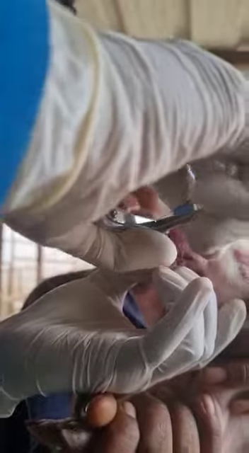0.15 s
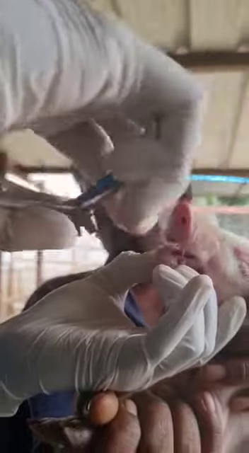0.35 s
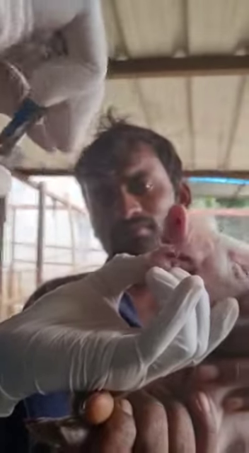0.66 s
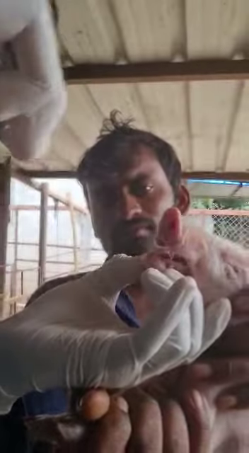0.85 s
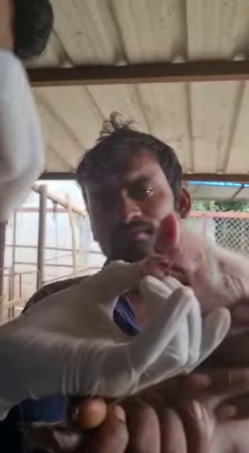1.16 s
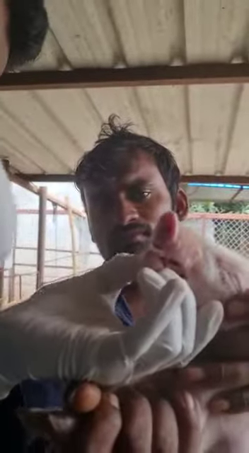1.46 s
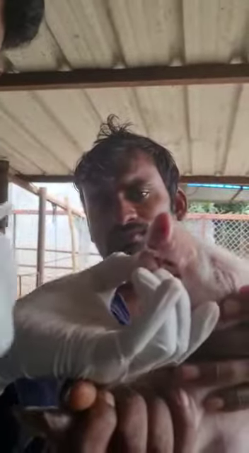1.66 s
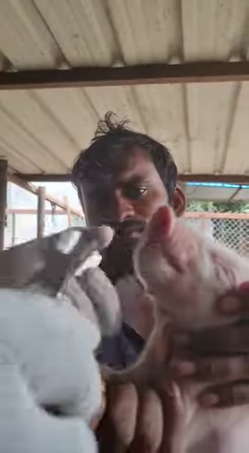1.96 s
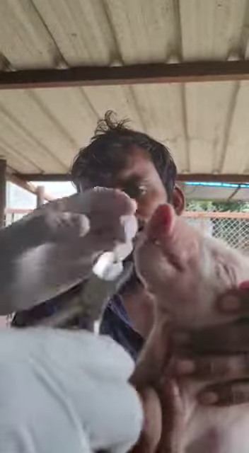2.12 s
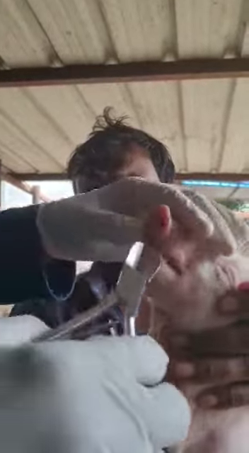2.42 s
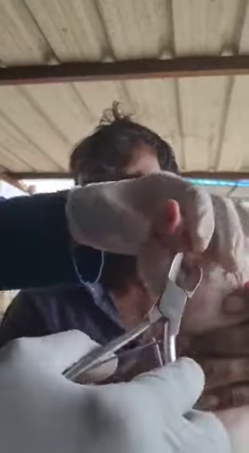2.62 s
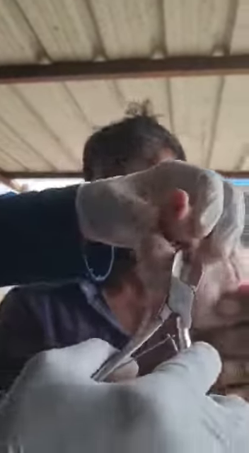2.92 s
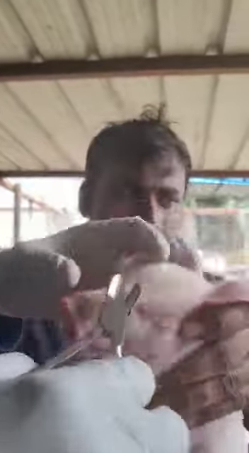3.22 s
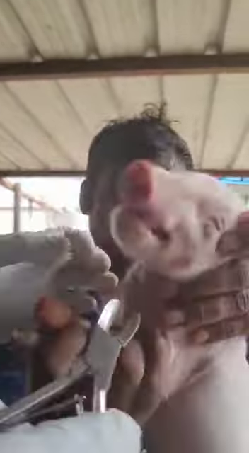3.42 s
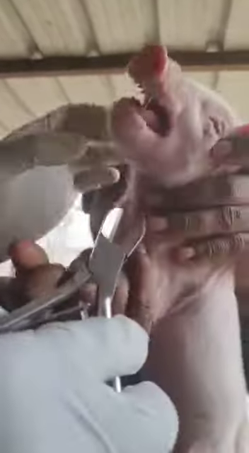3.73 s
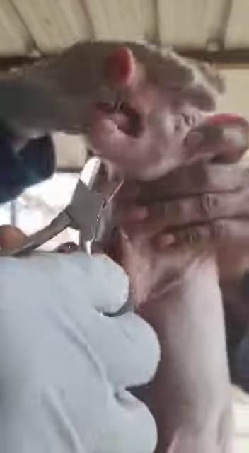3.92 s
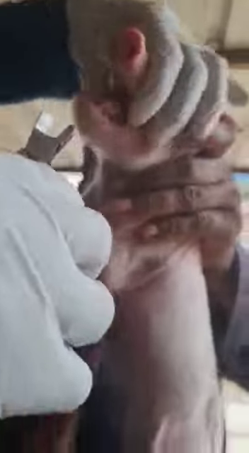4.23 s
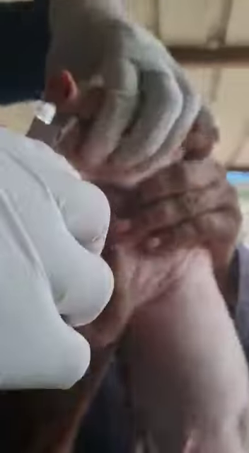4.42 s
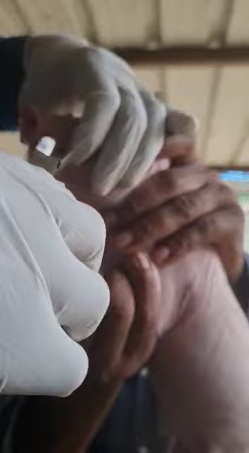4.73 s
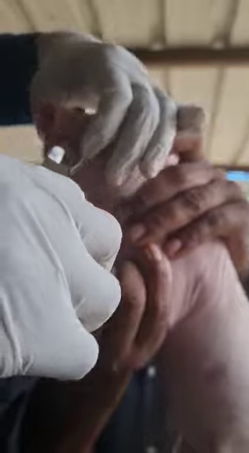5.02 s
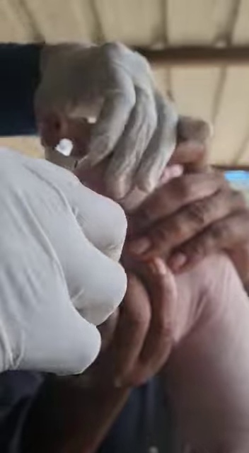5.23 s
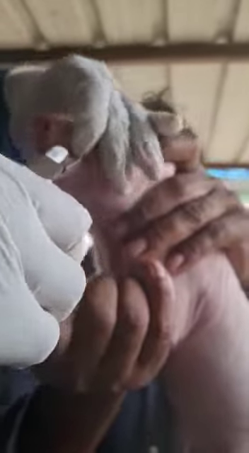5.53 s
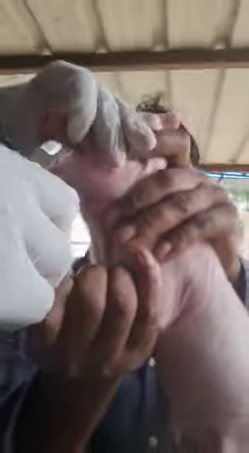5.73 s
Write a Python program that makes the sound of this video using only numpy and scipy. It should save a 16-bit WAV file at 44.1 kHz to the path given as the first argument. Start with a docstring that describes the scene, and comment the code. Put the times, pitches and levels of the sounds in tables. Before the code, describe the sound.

A close, slightly stereo phone pickup of a newborn piglet held in a roofed shed. At 0 to 0.55 s come short whines and a throaty growl with a soft bump. From about 0.6 to 1.0 s a piercing squeal wavers around 3.3 kHz and falls steeply at the end. Low nasal grunts, rattling roughly a hundred pulses a second, follow at 1.2-1.6, 1.9-2.35 and 2.55-2.75 s, with a brief whine at 1.6 s and a weak whimper near 2.7 s. Barks and yelps from 2.95 s climb into a shriek, then a harsh, trembling scream near 3.6 kHz from 3.4 to 4.3 s, the loudest event. A faint mutter and a tiny squeak near 4.6 s fade into near quiet around 5 s. A high wail swells from about 5.4 s, ending in a rough cry. Handling rumble, dull shed wash and short echoes sit beneath.

```python
"""Piglet held under a shed roof

A newborn piglet, held close to a phone's two microphone ports, squeals and grunts in turn.
Each squeal is a high whistle shaken by a second, lower oscillator in the larynx; most open in rasp,
reach a held note and slide away at the end. In the grunts the throat rattles in slow pulses through the snout.
Around it: faint wheezes, soft bumps, handling rumble, the wash of the shed, echoes off hands, chest and roof."""
import sys
import numpy as np
from scipy import signal
from scipy.fft import rfft, irfft, next_fast_len
from scipy.io import wavfile
from scipy.ndimage import map_coordinates

SR = 44100
rng = np.random.default_rng(int(sys.argv[2]) if len(sys.argv) > 2 else 0)


def output_pcm(signal):
    """Save a mono or channel-first signal as 16-bit PCM at the path in sys.argv[1].

    Samples are clipped to [-1, 1] before scaling.
    """
    pcm = np.clip(np.atleast_2d(signal).T, -1, 1) * 32767
    wavfile.write(sys.argv[1], SR, np.round(pcm).astype(np.int16))


N = 258867
T = np.arange(N) / SR  # s

# Mouth shapes of the cries; only the shape within a register counts. Each row: frequency in Hz, gain in dB.
WHINE_MOUTH = [(200, -49), (800, 2.5), (1150, -6.5), (1700, 4.5), (2800, -0.5), (4200, -12.5), (5200, -7),
               (7000, -20.5), (8800, -7.5), (11500, -18.5), (16000, -16.5)]
SQUEAL_MOUTH = [(200, -17), (400, -10), (800, -13), (1150, -29.5), (1800, 9.5), (2600, 1), (3400, -4),
                (4600, -12), (5700, -13), (6700, -15), (8100, -31), (9400, -11.5), (10800, -10.5),
                (11800, -23.5), (13600, -7.5), (16000, -31)]
DOUBLE_MOUTH = [(200, -1), (800, -6.5), (1150, -7), (2200, 9), (3200, -19.5), (3900, -11.5), (5100, -11.5),
                (6300, -10.5), (7500, -4.5), (8500, -1), (9800, -11), (12000, -7.5), (16000, -24)]
SCREAM_MOUTH = [(200, -36), (1000, -26.5), (1300, -10.5), (2200, 2.5), (2900, -12.5), (3600, -6.5),
                (4700, -13), (5600, -2), (6600, -8.5), (7400, -10), (8700, -3), (9900, -14), (11800, -1.5),
                (14500, -12.5), (16000, -22.5)]
WAIL_MOUTH = [(200, -20), (800, -20.5), (1150, -13.5), (1900, 0), (2700, -16), (3500, -13.5), (4300, -15),
              (5500, -9.5), (7300, -1.5), (9000, 1.5), (11800, 8), (13500, -13.5), (16000, -14)]
BARK_MOUTH = [(200, -13.5), (350, -6.5), (1100, -8.5), (2100, 3), (2600, 4.5), (3100, -28.5), (3600, -0.5),
              (4400, -21.5), (5900, 5.5), (6900, -16.5), (8900, -4.5), (11000, -10), (16000, -12)]
SHRIEK_MOUTH = [(200, -9), (400, 6), (1100, -8.5), (2100, 8.5), (3000, -14), (3700, -10), (5000, -25.5),
                (6200, 9), (7200, -4.5), (8700, 2), (11000, -10), (15500, -5)]
CROAK_MOUTH = [(200, 2), (350, 5), (1100, -2.5), (2000, 18.5), (3700, -9), (5500, 2), (7200, -16.5),
               (11500, -18), (14000, -27)]
YELP_MOUTH = [(200, -6), (800, -6.5), (1150, -8), (2200, 10), (3200, -24), (3900, -2.5), (5100, -13),
              (6400, 3), (7300, -10), (9200, 2.5), (10500, -12), (12000, -4), (16000, -11)]

# Tract shapes of the grunts, from open to nearly shut. Each row: frequency in Hz, gain in dB.
GROWL_TRACT = [(100, -27), (200, -3.5), (290, 3.5), (450, -16), (800, -7.5), (1200, -14.5), (1800, 9.5),
               (2900, -8), (3500, -7), (4400, -22), (5250, -6), (6500, -28), (9000, -25), (13000, -28.5),
               (16000, -29.5)]
GRUNT_TRACT = [(100, -16), (200, -1.5), (300, 4), (410, -4), (520, -13.5), (680, -6), (850, -5.5),
               (1100, -17.5), (1600, -4.5), (2500, -16), (3100, -24.5), (4400, -26.5), (5200, -34),
               (6300, -32), (9000, -44.5), (15500, -31)]
SNORT_TRACT = [(100, -23), (190, -9.5), (280, 1.5), (450, -14.5), (700, -7.5), (1100, -18.5), (1500, -17),
               (2500, -17.5), (3100, -27.5), (4400, -40), (6000, -39.5), (8500, -40), (11000, -38),
               (15500, -37.5)]
MUTTER_TRACT = [(100, -15.5), (190, -4.5), (280, 4.5), (430, -10.5), (650, -3.5), (1050, -18.5),
                (1350, -12.5), (1800, -29), (2300, -25), (3000, -39.5), (6000, -56), (8500, -49.5),
                (12000, -73), (15000, -50)]

# Edges in Hz between the low, middle and high registers of a call.
REGISTER_EDGES = (1200, 5000)

# The cries. Each row: start, length, attack and release in seconds, low tone, whistle and shrill edge in dB
# (before the scene's trim of the cries), whistle swell in dB per second, first, held and last pitch in Hz,
# climb to the held pitch in seconds, lower oscillator in Hz at full effort, grip, doubling, roughness and
# opening rasp (all 0-1), mouth (which also picks the sways, surge and chaos below).
CRIES = [(0.0, 0.2, 0.0011, 0.26, -57, -51.5, -43, 5, 2105, 2330, 2430, 0.059, 801, 0.4, 0.3, 0.54, 0.2, "whine"),
         (0.145, 0.118, 0.052, 0.022, -43, -24.5, -30.5, 37, 2450, 1667, 1510, 0.042, 700, 0.4, 0.15, 0.3, 0, "whine"),
         (0.257, 0.086, 0.015, 0.038, -32.5, -19.5, -27.5, -42, 1580, 1726, 1422, 0.025, 610, 0.24, 0.2, 0.65, 0.13, "growl"),
         (0.551, 0.044, 0.015, 0.023, -44.5, -12.5, -27.5, 4.5, 1560, 1810, 1829, 0.026, 697, 0.2, 0, 0.13, 0.2, "whine"),
         (0.574, 0.07, 0.011, 0.042, -43.5, -23.5, -22, 0, 1750, 2004, 2093, 0.039, 717, 1, 0.73, 0.5, 0.17, "bark"),
         (0.589, 0.43, .035, 0.052, -43, -20, -20, -12, 2200, 3344, 1420, .06, 781.4, 0.63, 0.29, .22, 0.2, "squeal"),
         (1.583, 0.11, 0.031, 0.057, -38.5, -28.5, -36.5, -35, 1398, 1920, 1340, 0.068, 676, .9, 0.1, 0.42, 0.1, "whine"),
         (2.71, 0.12, 0.023, 0.071, -36.5, -38, -34.5, -1, 1500, 2774, 1290, 0.042, 691, 0.67, 0.05, 0.56, 0.17, "whimper"),
         (2.949, 0.091, 0.023, 0.041, -38.5, -19, -21, 2, 1700, 2170, 2330, 0.064, 690, 0.88, 0.82, 0.77, 0.07, "bark"),
         (2.981, 0.11, 0.031, 0.051, -43.5, -19, -20.5, -19, 2750, 3197, 3145, 0.06, 745, 0.64, 0.2, 0.46, 0, "yelp"),
         (3.068, 0.2, 0.083, 0.075, -38, -23.5, -20.5, 5, 3180, 3700, 3680, 0.039, 792.5, 0.93, 0, 0.33, .12, "yip"),
         (3.358, 0.12, 0.047, 0.025, -41, -18, -16, 11, 2650, 3137, 3510, 0.07, 795.6, 0.87, 0.4, 0.7, 0.16, "shriek"),
         (3.42, 0.9, 0.029, 0.043, -51, -16.5, -20, -0.5, 3560, 3550, 3544, 0.023, 975, 0.71, 0.47, 0.31, 0.08, "scream"),
         (5.213, 0.58, 0.023, 0.054, -56, -58, -56, 51.5, 2280, 2770, 2750, .07, 755, 0.68, 0, 0.09, 0.14, "wail"),
         (5.391, 0.41, .29, 0.047, -44.5, -33, -26, 82, 2798, 2630, 2630, 0.071, 779.5, 0.63, 0.23, 0.31, 0, "wail"),
         (5.744, 0.17, 0.063, .03, -42.5, -18, -20, -4, 2600, 2730, 2630, .05, 763, 0.86, 0.52, 0.72, 0, "croak")]
# Wavering of the longer cries, in place of the held pitch. Each row: time in seconds, pitch in Hz.
WHISTLE_SWAY = {"squeal": [(.66, 3145), (.69, 3333), (.748, 3395), (.77, 3200), (.82, 3332), (.925, 3364),
                (.975, 3250), (1.0, 2970), (1.015, 2380)], "yip": [(3.11, 3300), (3.135, 3664),
                (3.156, 3526), (3.18, 3788), (3.24, 3793)], "scream": [(3.46, 3517), (3.466, 3444),
                (3.482, 3673), (3.514, 3434), (3.528, 3660), (3.56, 3497), (3.59, 3693), (3.614, 3577),
                (3.65, 3684), (3.674, 3550), (3.708, 3780), (3.738, 3520), (3.76, 3736), (3.808, 3585),
                (3.816, 3660), (3.912, 3803), (3.932, 3867), (4.006, 3863), (4.026, 3773), (4.056, 3760),
                (4.092, 3500), (4.12, 3780), (4.136, 3799), (4.154, 3555), (4.188, 3747), (4.218, 3440),
                (4.24, 3820), (4.258, 3786), (4.272, 3683), (4.29, 3646)], "wail": [(5.28, 2650),
                (5.378, 2882), (5.498, 2704), (5.59, 2964), (5.61, 2699), (5.67, 2910), (5.696, 2630),
                (5.728, 2811), (5.755, 2592), (5.8, 2812)]}
# Wavering of the lower oscillator at full effort. Each row: time in seconds, pitch in Hz.
LOWER_SWAY = {"scream": [(3.46, 878), (3.518, 945), (3.848, 988), (3.984, 1084), (4.112, 941), (4.264, 997),
              (4.3, 900)], "yip": [(3.1, 699.5), (3.2, 833), (3.27, 764)], "whimper": [(2.74, 739),
              (2.82, 620)]}
# The scream bursts out, tires and rallies about its own levels. Each row: time in seconds, whistle and edge in dB.
SURGE = {"scream": [(3.44, -3, 1), (3.457, -9, -0.5), (3.476, 5.5, 4), (3.54, 3.5, 2), (3.6, 2, -0.5),
         (3.7, 2, 1.5), (3.78, 0.5, 0), (3.9, 1, -0.5), (3.96, 1, 0.5), (4.17, 0.5, -5.5),
         (4.26, -0.5, 0.5)]}
# The long cries pass in and out of chaos. Each row: time in seconds, factor on the cry's roughness.
CHAOS = {"squeal": [(.65, 2.2), (.77, 1.8), (.81, .7), (.95, .7), (1.0, 1.3)], "scream": [(3.45, 1.5),
         (3.48, .7), (3.57, .85), (3.63, 1.4), (3.7, 1), (3.79, 1.5), (3.83, 1), (4.0, .85), (4.09, 1.6),
         (4.2, 1.4), (4.26, 1)]}
# Rasp strengthens the low tone most and the whistle a little, and slightly weakens the shrill edge.
# One row: low tone, whistle and shrill edge in dB per unit of rasp.
RASP_TILT = (14.5, 3, -1.5)
# Growth with effort. One row: exponents (no unit) of low tone, whistle and shrill edge.
CRY_POWERS = (0.56, 0.81, 1.47)

# Soft bumps of handling. Each row: start and length in seconds, centre in Hz, level in dB before the swell and fade.
BUMPS = [(0.0, 0.084, 120, -51), (0.71, 0.29, 185, -48.5), (1.77, .13, 125, -50.5)]
# Handling and shed rumble. Each row: time in seconds, level in dB before a small lift.
RUMBLE = [(0.0, -56), (0.15, -63), (0.96, -52.5), (4.86, -81), (5.12, -94.5), (5.87, -57.5)]
# Wash of the shed. Each row: time in seconds, level in dB about which it wanders.
AMBIENT = [(0, -50.5), (.6, -44.5), (.82, -46.5), (1.1, -59), (1.72, -53.5), (1.92, -54.5), (2.42, -59.5),
           (3.33, -55), (4.42, -62.5), (4.95, -68.5), (5.06, -76), (5.3, -68), (5.87, -46.5)]
# Colours of rumble and wash. Each row: frequency in Hz, gain in dB.
RUMBLE_COLOUR = [(20, -19), (55, 3), (120, -8), (200, -22.5), (500, -80.5)]
AMBIENT_COLOUR = [(60, -22.5), (180, -6.5), (280, 0.5), (450, -7), (800, -6), (1150, -16), (1700, -9),
                  (3000, -22), (4500, -19.5), (8000, -32), (16000, -31)]

# The grunts. Each row: start, length, attack and release in seconds, roughness (0 to a little over 1),
# snout, throat and air in dB (before the scene's trim of the grunts), throat swell in dB per second,
# throat boost in dB while the mouth is open, top of the smearing in Hz, tract.
GRUNTS = [(0.245, 0.12, 0.006, 0.015, 0.42, -38, -29.5, -31, 0.5, 2, 1000, "growl"),
          (0.332, 0.3, 0.034, 0.099, 0.08, -34, -26.5, -39, 10.5, 0, 1000, "growl"),
          (1.171, 0.47, 0.093, 0.093, 0.07, -30.5, -39, -42.5, 0, 5, 2800, "grunt"),
          (1.902, 0.46, 0.11, 0.13, .24, -29.5, -40.5, -47.5, -32, -0.5, 2800, "snort"),
          (2.541, .2, 0.044, 0.05, .2, -27, -41, -41, -66, 9.5, 2800, "snort"),
          (4.45, 0.49, .11, 0.19, 0.35, -38, -54, -60, -36, -1, 2800, "mutter"),
          (5.122, 0.21, 0.071, 0.12, 1.16, -52, -62.5, -60.5, -9, 0, 2800, "mutter")]
# Growth with effort. One row: exponents (no unit) of snout, throat and air.
GRUNT_POWERS = (1.44, 0.73, 1.3)
# Pace of the rattle, about which it wanders. Each row: time in seconds, pulses per second.
PACE = [(0.245, 95), (0.33, 103.4), (0.46, 107), (0.53, 107), (1.18, 69.4), (1.22, 94), (1.27, 97.4),
        (1.32, 108.6), (1.42, 108), (1.53, 102.7), (1.62, 86), (1.91, 84), (2.0, 90.6), (2.14, 96),
        (2.19, 84), (2.23, 95), (2.31, 77), (2.54, 86.4), (2.61, 99), (2.74, 85.5), (4.45, 82.5),
        (4.65, 108), (4.9, 85)]
# Snout resonances that hold back each slap. Each row: centre in Hz, width in Hz.
SNOUT = [(275, 72), (560, 170), (720, 140), (930, 140), (1240, 130), (1480, 130), (1900, 190), (2450, 160)]

# Thin wheezes from the pinched snout. Each row: start, length and time to the loudest point in seconds,
# first pitch, pitch when loudest and last pitch in Hz, peak level in dB.
WHEEZES = [(2.631, 0.14, .027, 3600, 3540, 4080, -42), (4.487, 0.23, 0.16, 3450, 6360, 3477, -62.5),
           (4.583, 0.025, 0.011, 2027, 2207, 2470, -30.5), (4.871, 0.13, 0.045, 2587, 2410, 2335, -56.5)]

# Delay at the right port. Each row: time in seconds, delay in ms.
LAG = [(0, 0.16), (2.9, 0.18), (3.5, 0.21), (5.87, 0.22)]
# The head turns. Each row: time in seconds, left minus right in dB.
TURN = [(3.0, -0.5), (3.4, -1), (3.6, 1.5), (3.88, 0), (4.15, 4), (4.28, 2), (4.45, 1), (5.3, -2),
        (5.8, -1)]
# Colour difference between the ports. Each row: frequency in Hz, left minus right in dB.
BALANCE = [(100, -1.5), (900, 0.5), (1700, -5.5), (2400, -5.5), (3300, 2), (4000, 4.5), (5200, 9.5),
           (6500, 1), (8500, 17), (12000, 10.5), (16000, 18.5)]
# Decay of the shed's tail. Each row: frequency in Hz, time to fall 60 dB in seconds.
SHED_DECAY = [(200, 0.32), (2000, 0.64), (6000, 0.5), (15000, 0.041)]


def amp(db):
    """Decibels to gain."""
    return 10 ** (np.asarray(db) / 20)


def unit(x):
    """Scaled to rms 1."""
    return x / np.sqrt(np.mean(x ** 2) + 1e-20)


def along(points, hz):
    """(Hz, value) points read on a log frequency axis."""
    f, v = np.transpose(points)
    return np.interp(np.log(hz + 1), np.log(f + 1), v)


def over_time(rows):
    """(s, value) rows as one value per sample."""
    s, values = np.transpose(rows)
    return np.interp(T, s, values)


def wobble(rate, t=T):
    """A smooth random curve, rate knots a second."""
    knots = rng.standard_normal(int(T[-1] * rate) + 4)
    return map_coordinates(knots, [t * rate], order=2)


def ease(u):
    """A smooth step from 0 to 1 as u goes from 0 to 1."""
    return np.sin(np.pi / 2 * np.clip(u, 0, 1)) ** 2


def clock(length):
    """Sample times from the start of an event."""
    return np.arange(int(length * SR)) / SR


def push(t, attack, release):
    """Effort 0-1 behind a call: attack, hold, release."""
    return ease(t / attack) * ease((t[-1] - t) / release)


def add(track, start, sound):
    """Mixes a sound into the track at its start time."""
    room = track[max(0, round(start * SR)):][:len(sound)]
    room += sound[:len(room)]


def filtered(x, response):
    """x times a zero-phase response of frequency."""
    size = next_fast_len(N + 8192, True)
    spectrum = rfft(x, size) * response(np.fft.rfftfreq(size, 1 / SR))
    return irfft(spectrum, size)[..., :N]


def cavity(x, shape, size=2048):
    """x rings through a causal, minimum-phase filter with the given (Hz, dB) shape."""
    gains = amp(along(shape, np.fft.rfftfreq(size, 1 / SR)))
    cepstrum = irfft(np.log(gains))
    # folding the cepstrum onto positive times makes the filter causal
    fold = 1 + np.sign(size / 2 - np.arange(size)) * (np.arange(size) > 0)
    impulse = irfft(np.exp(rfft(cepstrum * fold)))
    return signal.oaconvolve(x, impulse)[:len(x)]


def utter(source, gains, shape, smooth=0.037):
    """The source passes the tract; its low, middle and high registers are levelled, then follow their gains."""
    voice = cavity(source, shape)
    window = np.hanning(int(smooth * SR))  # smooth in s
    weight = signal.fftconvolve(np.ones(len(voice)), window, "same")
    call = np.zeros(len(voice))
    bands = [(REGISTER_EDGES[0], "low"), (REGISTER_EDGES, "band"), (REGISTER_EDGES[1], "high")]
    for (edge, kind), gain in zip(bands, gains):
        part = signal.sosfilt(signal.butter(5, edge, kind, fs=SR, output="sos"), voice)
        power = signal.fftconvolve(part ** 2, window, "same") / weight
        call += gain * part / np.sqrt(np.abs(power) + 1e-14)
    return call


def larynx(t, pitch, low_hz, rough, grip, doubling, swing=0.55, pinch=0.46, jitter=0.0093,
           low_db=-12, buzz=0.086, count=9):
    """Two coupled oscillators: the lower one bends and pinches the whistle, which grows sidebands."""
    def drift(rate):
        return wobble(rate, t)
    tremor = jitter * (drift(90) + 2 * rough * drift(300))
    high = 2 * np.pi * np.cumsum(pitch * (1 + tremor)) / SR
    low = 2 * np.pi * np.cumsum(low_hz * (1 + 0.061 * rough * drift(250))) / SR
    # forced folds repeat only every second or fourth cycle: lines appear in between
    second = np.exp(.5j * low) * amp(3 * drift(40))
    fourth = .7 * np.exp(.25j * low + 1j * drift(60))
    uneven = doubling * (second + fourth)
    beat = grip * (np.exp(1j * low) + .18 * np.exp(2j * low)) * amp(2.5 * drift(35))
    shake = beat + uneven
    bend = swing * shake.imag + .4 * rough * drift(1300)  # radians
    opening = (1 + pinch * shake.real) * amp(2.2 * rough * drift(600))
    whistle = np.zeros(len(t))
    for k in range(1, count + 1):
        # each harmonic frays into a band of its own as the voice roughens
        fray = amp(2.5 * drift(45)) + .9 * rough ** 2 * (drift(600) + 1j * drift(600))
        below_limit = k * pitch < .42 * SR
        whistle += (fray * np.exp(1j * k * (high + bend))).real * below_limit
    overtones = np.zeros(len(t))
    for k in range(3, count + 1):
        share = doubling if k % 2 else 1  # odd k lie between the lower oscillator's harmonics
        overtones += amp(6.3 * drift(25)) * np.sin(k * low / 2) * share
    low_tone = np.sin(low) + doubling * np.sin(low / 2) + buzz * overtones
    turbulence = (.03 + .32 * rough ** 2) * rng.standard_normal(len(t))
    breaks = amp(0.5 * rough ** 2 * drift(170))  # a rough voice breaks up in coarse bursts
    return breaks * opening * (whistle + turbulence) + amp(low_db) * low_tone


def squeals():
    """Each cry moves to a held note, roughens where that note dips, and slides to its last pitch at the end."""
    mouths = {"whine": WHINE_MOUTH, "squeal": SQUEAL_MOUTH, "yelp": YELP_MOUTH, "scream": SCREAM_MOUTH,
              "wail": WAIL_MOUTH, "yip": DOUBLE_MOUTH, "bark": BARK_MOUTH, "shriek": SHRIEK_MOUTH,
              "croak": CROAK_MOUTH, "whimper": DOUBLE_MOUTH, "growl": GROWL_TRACT}
    drop_s, clear_s, bloom_s = 0.091, 0.035, 0.079  # final slide, clearing of rasp, fading of bloom
    out = np.zeros(N)
    for (start, length, attack, release, low_db, whistle_db, edge_db, swell,
         first_hz, held_hz, last_hz, climb, lower_hz, grip, doubling, roughness, opening_rasp, mouth) in CRIES:
        t = clock(length)
        effort = push(t, attack, release)

        def sway(sways, steady):
            return np.interp(start + t, *np.transpose(sways.get(mouth, [(start, steady)])))
        note = sway(WHISTLE_SWAY, held_hz) * (1 + 0.006 * wobble(30, t))
        pitch = first_hz + (note - first_hz) * ease(t / climb)
        drop = np.clip(1 - (length - t) / drop_s, 0, 1) ** 3.6
        pitch += (last_hz - pitch) * drop
        low_hz = sway(LOWER_SWAY, lower_hz) * (1 - 0.11 * (1 - effort))  # sags without effort

        growth_db = swell * (t - length / 2)
        rasp = opening_rasp * ease((climb - t) / clear_s + .5)
        # a cry roughens as it swells, and flickers
        rough_db = 0.35 * growth_db + 1.44 * wobble(25, t)
        strain = roughness * sway(CHAOS, 1) * (1 + effort) / 2 * amp(rough_db)
        dip = np.maximum(1 - note / held_hz, 0)
        rough = np.minimum(strain + rasp + 0.37 * drop + 3 * dip, .95)

        levels = np.add.outer([low_db, whistle_db, edge_db], 0.6 * wobble(28, t))
        # the whistle surges as it locks onto its note
        bloom_db = 2 * ease((t - climb) / clear_s + .5) * np.exp(-np.abs(t - climb) / bloom_s)
        levels[1] += growth_db + bloom_db
        if mouth in SURGE:
            times, *surges = np.transpose(SURGE[mouth])
            levels[1:] += [np.interp(start + t, times, surge) for surge in surges]
        gains = [amp(db + tilt * rasp) * effort ** power
                 for db, tilt, power in zip(levels, RASP_TILT, CRY_POWERS)]
        source = larynx(t, pitch, low_hz, rough, grip, doubling + rasp / 2)
        add(out, start, utter(source, gains, mouths[mouth]))
    return out


def bumps():
    """Dull, soft bumps, narrow bands of low noise, swell and fade as the hands shift their hold."""
    out = np.zeros(N)
    for start, length, hz, db in BUMPS:
        t = clock(length)
        murk = ((wobble(70, t) + 1j * wobble(70, t)) * np.exp(2j * np.pi * hz * t)).real
        add(out, start, amp(db) * unit(murk) * push(t, length / 2, length / 2))
    return out


def background():
    """Low handling rumble and the dull wash of the shed: coloured noise, partly shared by both ports."""
    def wash(colour, apart):
        noise = rng.standard_normal(N) + apart * rng.standard_normal((2, N))
        return unit(filtered(noise, lambda hz: amp(along(colour, hz))))
    rumble_db = over_time(RUMBLE) + 1.5 + 1.6 * wobble(26)
    ambient_db = over_time(AMBIENT) + 1.5 * wobble(20)
    rumble = amp(rumble_db) * wash(RUMBLE_COLOUR, apart=1.0)
    return rumble + amp(ambient_db) * wash(AMBIENT_COLOUR, apart=.3)


def folds(t, rate, rough, puff_s=.002, leak=.25, scatter_s=.001, rebound_share=.5):
    """Slack folds slap shut at the given rate; each slap lets out a puff of air."""
    beats = np.flatnonzero(np.diff(np.floor(np.cumsum(rate) / SR)))
    chance = rng.standard_normal((len(beats), 2)) * rough
    at = np.clip(beats + scatter_s * SR * chance[:, 0], 0, len(t) - 1).astype(int)
    slaps = np.bincount(at, amp(3 * chance[:, 1]), len(t))
    bursts = slaps * amp(4 * wobble(150, t))
    puffs = signal.lfilter([1], [1, -np.exp(-1 / (puff_s * SR))], bursts) + leak * (.5 + rough)
    # the air is faint under the snout's low resonance and takes over in the treble
    air_shape = [(300, -26), (900, -18), (2000, -10), (5000, 0)]  # (Hz, dB)
    air = cavity(puffs * rng.standard_normal(len(t)), air_shape)
    # the soft tissue flaps once more, 3.6 ms after it has shut
    late_slaps = np.roll(slaps, round(.0036 * SR))
    rebound = rebound_share * cavity(late_slaps, [(500, 0), (2000, -20)])
    return slaps + rebound + (.15 + rough) * air


def snout(x, smear_hz):
    """Allpass resonances below smear_hz: winding passages smear each slap over ms without changing its colour."""
    for hz, width in SNOUT:
        if hz < smear_hz:
            r = np.exp(-np.pi * width / SR)
            poles = [1, -2 * r * np.cos(2 * np.pi * hz / SR), r * r]
            x = signal.lfilter(poles[::-1], poles, x)
    return x


def grunts():
    """The throat rattles at a changing pace through the snout; its level shifts as the mouth closes."""
    tracts = {"growl": GROWL_TRACT, "grunt": GRUNT_TRACT, "snort": SNORT_TRACT, "mutter": MUTTER_TRACT}
    open_attacks, close_s = 1.17, 0.078  # the mouth's closing is centred on this many attack times
    out = np.zeros(N)
    for (start, length, attack, release, rough, snout_db, throat_db, air_db,
         swell, open_db, smear_hz, tract) in GRUNTS:
        t = clock(length)
        effort = push(t, attack, release)
        pace = np.interp(start + t, *np.transpose(PACE)) * (1 + .02 * wobble(35, t))
        source = snout(folds(t, pace, rough), smear_hz)
        mouth_open = ease((open_attacks * attack - t) / close_s + .5)
        throat = throat_db + swell * (t - length / 2) + open_db * mouth_open
        gains = [amp(db + 0.6 * wobble(40, t)) * effort ** power
                 for db, power in zip((snout_db, throat, air_db), GRUNT_POWERS)]
        add(out, start, utter(source, gains, tracts[tract]))
    return out


def wheezes():
    """Faint unsteady whistles of air in the snout swell and fade; the pitch bends most where they are loudest."""
    out = np.zeros(N)
    for start, length, attack, first_hz, loud_hz, last_hz, db in WHEEZES:
        t = clock(length)
        flow = np.interp(t, [0, attack, length], [0, 1, 0])
        rest_hz = np.where(t < attack, first_hz, last_hz)
        bent_hz = rest_hz + (loud_hz - rest_hz) * flow ** 2
        hz = bent_hz * (1 + .008 * wobble(500, t))
        add(out, start, amp(db) * flow * np.sin(2 * np.pi * np.cumsum(hz) / SR))
    return out


def ports(x):
    """The snout is nearer the left port: the right one hears it later; their levels shift as the head turns."""
    late = map_coordinates(x, [np.arange(N) - over_time(LAG) * SR / 1000], order=5)
    gains = amp(over_time(TURN) * np.array([[.5], [-.5]]))
    return np.array([x, late]) * gains / np.sqrt(np.mean(gains ** 2, axis=0))


def hands(x, near_db=-8, near_s=.012, move_s=.25):
    """Quick echoes off hands and chest, thin in the bass; they change every move_s as the piglet struggles."""
    out, age = np.zeros((2, N)), clock(4 * near_s)
    thin = signal.butter(1, 2000, "high", fs=SR, output="sos")
    for middle in np.arange(0, T[-1] + move_s, move_s):
        inside = np.abs(T - middle) < move_s
        # neighbouring pieces crossfade
        piece = x[inside] * np.cos(np.pi / 2 * (T[inside] - middle) / move_s)
        for port in out:
            near = rng.standard_normal(len(age)) * np.exp(-2 * age / near_s) * (age > .001)
            near = signal.sosfilt(thin, near)
            add(port, T[inside][0], signal.fftconvolve(piece, near / np.linalg.norm(near)))
    return amp(near_db) * out


def shed(x, tail_db=-26):
    """The short tail of the roof: noise that decays at its own speed in each band, different at each port."""
    hz, t, z = signal.stft(rng.standard_normal((2, SR // 2)), SR, nperseg=256)
    decay = amp(-60 * t / along(SHED_DECAY, hz)[:, None])
    tail = signal.istft(z * decay, SR, nperseg=256)[1]
    tail = amp(tail_db) * tail / np.linalg.norm(tail[0])
    return signal.fftconvolve(x[None], tail, axes=1)[:, :N]


def scene():
    """The piglet at two ports, in the shed."""
    piglet = amp(-1.21) * squeals() + amp(0.18) * grunts() + wheezes()

    def shade(hz):
        gains = amp(along(BALANCE, hz) * np.array([[.5], [-.5]]))
        return gains / np.sqrt(np.mean(gains ** 2, axis=0))
    heard = ports(piglet) + hands(piglet) + shed(piglet)
    return filtered(heard, shade) + bumps() + background()


def record(dry, ceiling=1.0, top_hz=16000):
    """The phone rounds off the loudest peaks and cuts off steeply above its band limit."""
    held = dry / (1 + np.abs(dry / ceiling) ** 6) ** (1 / 6)
    return filtered(held, lambda hz: 1 / np.sqrt(1 + (hz / top_hz) ** 160))


dry = scene()
out = record(dry)
output_pcm(out)
```